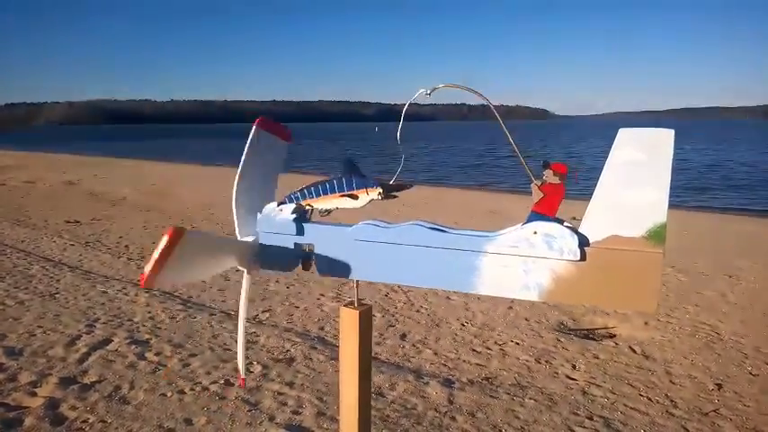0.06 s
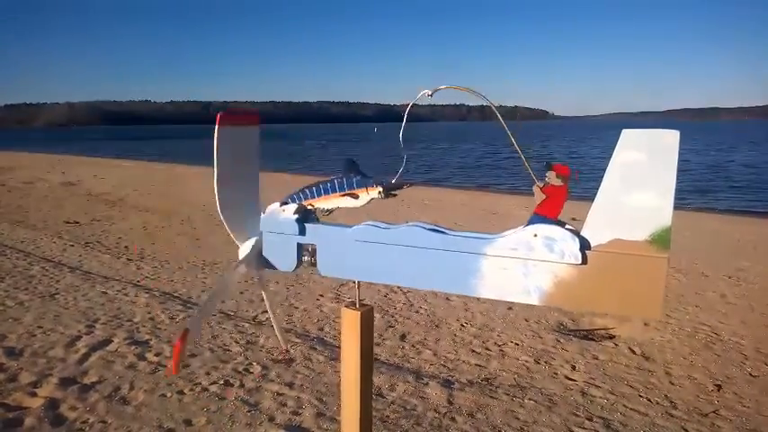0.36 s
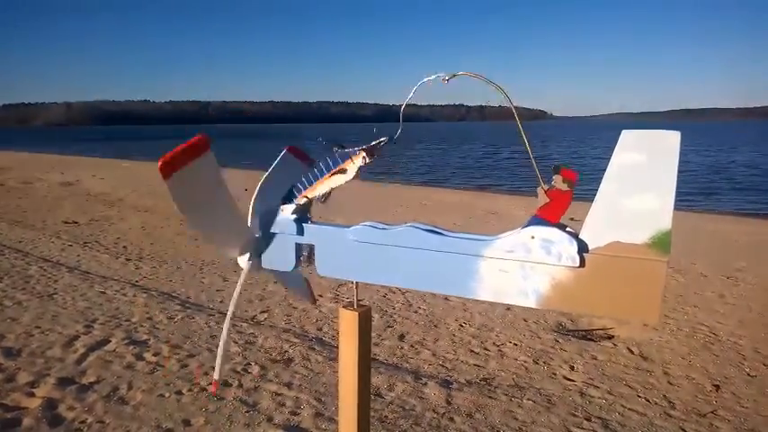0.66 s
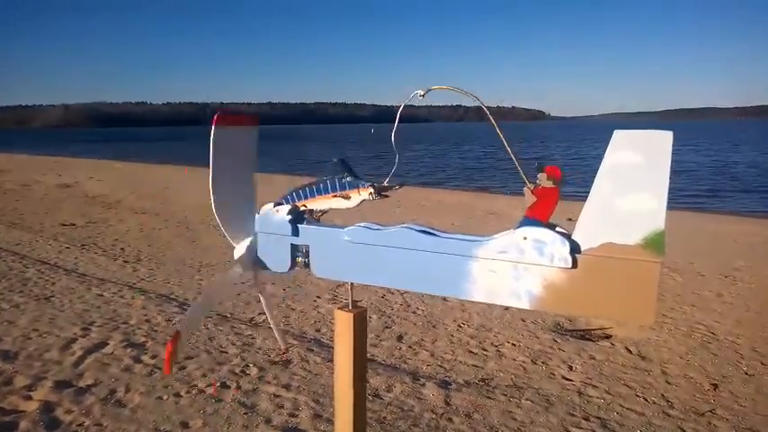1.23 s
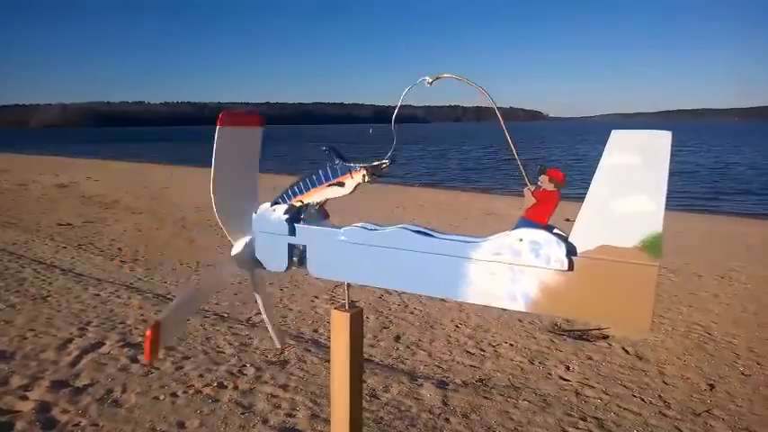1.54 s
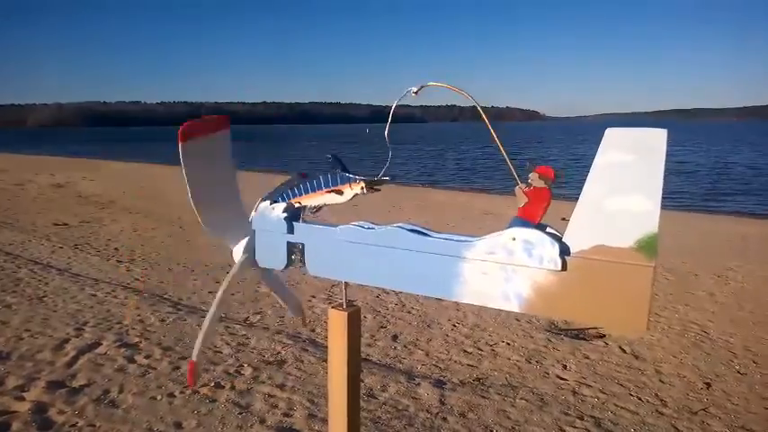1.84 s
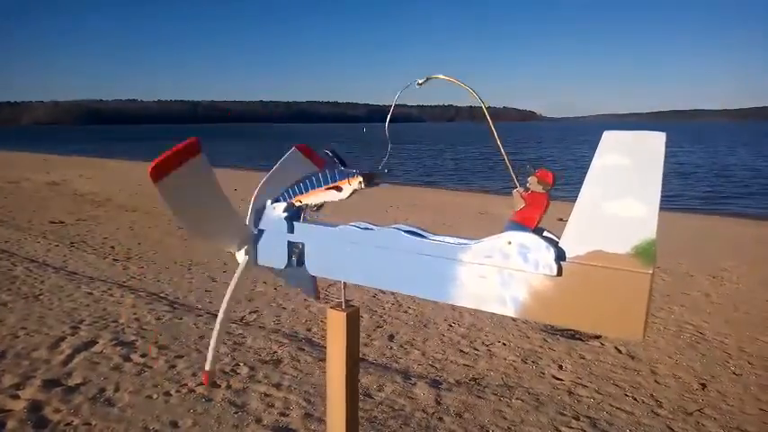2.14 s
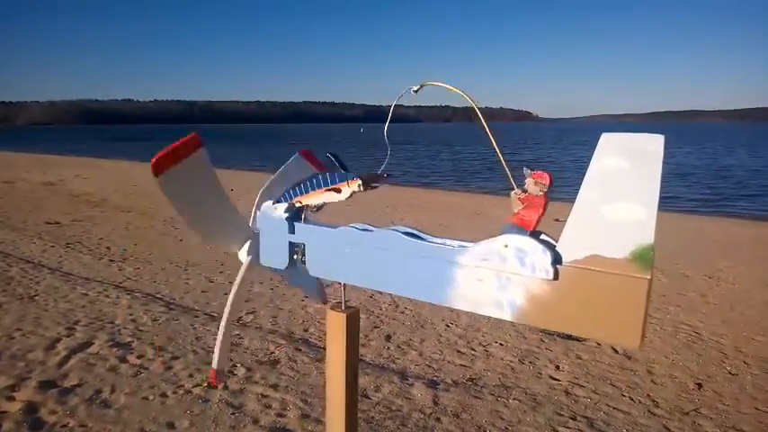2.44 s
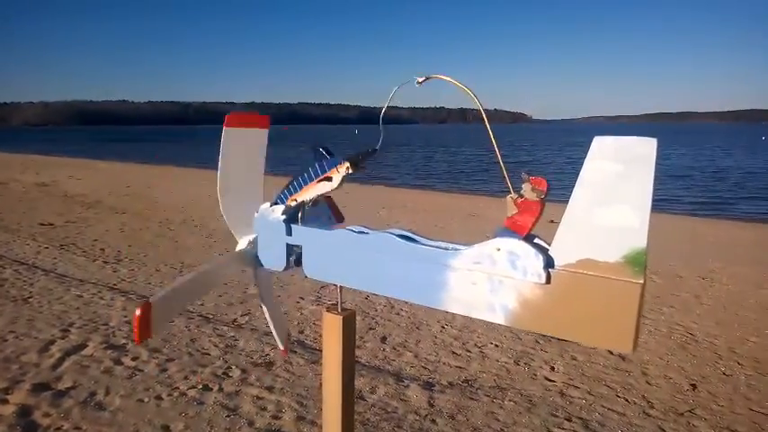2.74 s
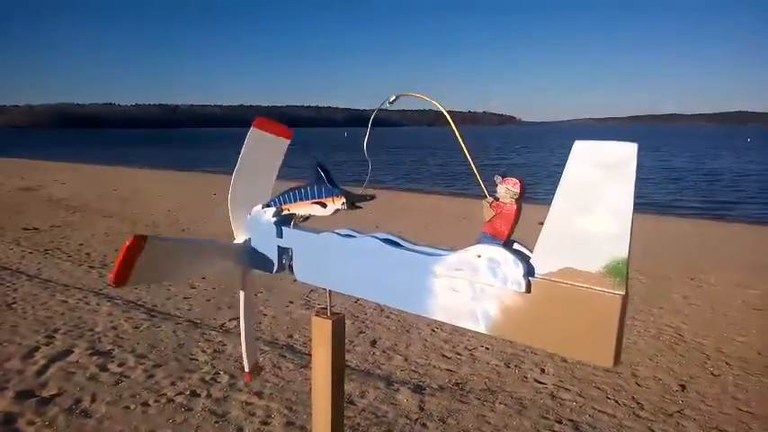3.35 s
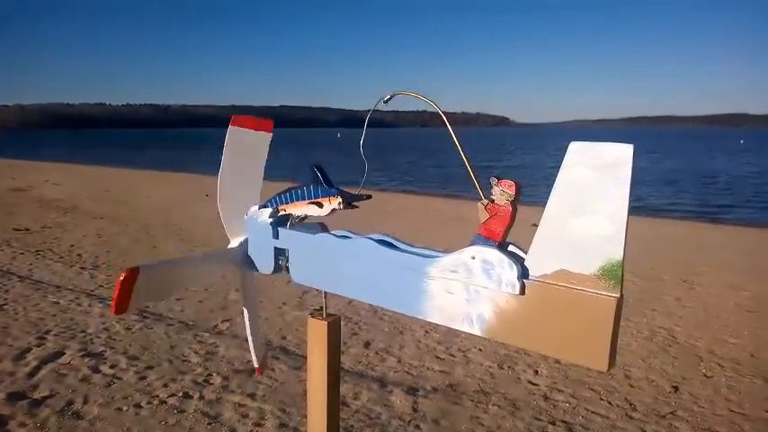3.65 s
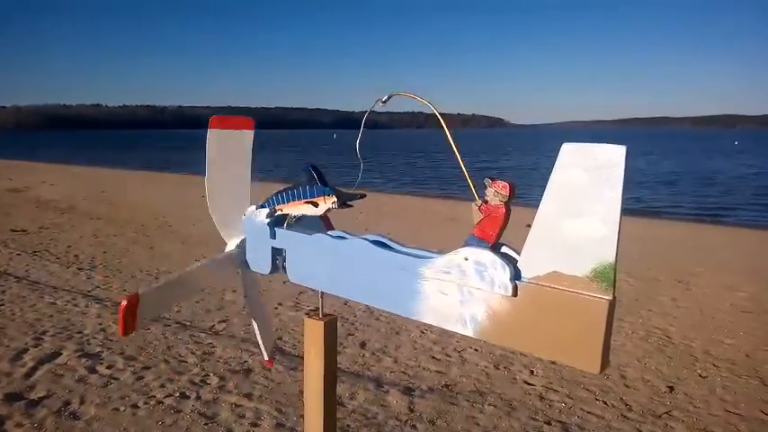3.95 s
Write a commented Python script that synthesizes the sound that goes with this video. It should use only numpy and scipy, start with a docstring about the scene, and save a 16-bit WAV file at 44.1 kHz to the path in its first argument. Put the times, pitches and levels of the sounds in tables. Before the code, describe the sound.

Irregular scraping, clacking and wire chatter from a wooden whirligig spinning in gusty wind.

```python
"""A wooden whirligig spins in a gusty breeze on a beach. From the start its loose shaft scrapes in
uneven strokes, the slack crank clacks and the wire linkage chatters with a bright ring, while wind
buffets the microphone over a faint shore hiss. Around the first second the dry bearing squeaks and
the wooden body starts to knock. The biggest gust lands near 1.7 s; then the wind eases while the
clacks and wire strikes grow harder, softening again just before the end."""
import sys
import numpy as np
from scipy.fft import rfft, irfft, next_fast_len
from scipy.io import wavfile
from scipy.ndimage import map_coordinates

SR = 44100
rng = np.random.default_rng(int(sys.argv[2]) if len(sys.argv) > 2 else 0)


def file_out(sig):
    """Save sig as 16-bit WAV at sys.argv[1]."""
    # one column per channel
    cols = np.atleast_2d(sig).T
    # limit, then scale
    lim = np.clip(cols, -1, 1)
    pcm = np.round(lim * 32767).astype(np.int16)
    wavfile.write(sys.argv[1], SR, pcm)


N = 176400

# Strokes of the shaft in its bearing: start t/s, end t/s, scrape level/dB, chatter level/dB.
# Levels in all tables are relative; each layer sets its own gain.
SHAFT_STROKES = [(.01, 0.094, -60.5, -58), (0.15, 0.198, -51.5, -57), (0.258, 0.33, -56, -59),
                 (0.371, 0.408, -54.5, -50), (0.432, 0.447, -87, -59), (0.477, 0.626, -55, -49.5),
                 (0.732, 0.762, -54, -50.5), (0.806, 0.845, -56, -67), (0.941, 1.106, -52.5, -56.5),
                 (1.167, 1.263, -50.5, -46), (1.319, 1.447, -49.5, -52), (1.484, 1.549, -54.5, -50.5),
                 (1.558, 1.677, -49, -48.5), (1.693, 1.787, -55, -58), (1.805, 1.849, -52, -54),
                 (1.936, 1.991, -46.5, -52), (2.011, 2.079, -46.5, -46.5), (2.097, 2.188, -53, -48.5),
                 (2.205, 2.291, -52.5, -43.5), (2.314, 2.447, -51, -49), (2.461, 2.529, -52.5, -45.5),
                 (2.531, 2.609, -45.5, -43.5), (2.621, 2.741, -50.5, -42), (2.851, 2.899, -47, -37),
                 (2.926, 3.072, -53, -50), (3.098, 3.227, -54.5, -48), (3.25, 3.335, -53.5, -56.5),
                 (3.316, 3.439, -50.5, -47), (3.457, 3.488, -61, -54), (3.492, 3.611, -57.5, -74),
                 (3.718, 3.788, -64.5, -59.5), (3.871, 3.921, -62, -84), (3.912, 3.952, -52, -51.5),
                 (3.965, 3.998, -65, -60.5)]


def shaft_scrape():
    """The shaft rubs in gritty strokes: a dry hiss, and small taps that set the wooden frame whirring."""
    hiss_colour = [(200, -40.5), (500, 10.5), (1000, 6), (2000, 9), (3500, 7), (5500, -13), (7000, 5),
                   (9800, 4.5), (12500, -8.5), (14000, -10), (16000, -17)]  # friction spectrum: f/Hz, level/dB
    frame_modes = [(599, 47, 1.5), (915, 51, 7.5), (1184, 62, 0), (1452, 18.3, 2.5), (1705, 133, 0),
                   (1826, 20, 0.5), (2358, 140, -4), (2700, 270, -5.5), (3085, 450, -5), (3510, 36, -31.5),
                   (4180, 130, -7), (4950, 93, -10), (5210, 37, -15.5), (5520, 200, -2.5)]  # frame resonances: f/Hz, width/Hz, level/dB
    strokes = [(start, end, db) for start, end, db, _ in SHAFT_STROKES]
    t = np.arange(N) / SR
    rise_s, release_s = .005, .0055
    pressure = np.full(N, amp(-79))
    for start, end, db in strokes:
        rise = np.clip((t - start) / rise_s + .5, 0, 1)
        pressure += amp(db) * rise * np.exp(-np.maximum(t - end, 0) / release_s)
    slips = unit(amp(5.3 * wobble(150) + 1.15 * wobble(28.23)))
    hiss = unit(filtered(slips * rng.standard_normal(N), lambda hz: amp(along(hiss_colour, hz))))
    force = amp(-11.5) * pressure
    tap = np.exp(-np.arange(1024) / (.0014 * SR))
    for s, db in rattle(strokes, per_s=85, scatter_db=6.5):
        add(force, s, amp(db + 2) * tap)

    def frame(hz):
        return sum((-1) ** k * amp(db) * 1j * hz * width / (centre ** 2 - hz ** 2 + 1j * hz * width)
                   for k, (centre, width, db) in enumerate(frame_modes))

    whir = filtered(rng.standard_normal(N) * force, frame)
    return amp(-5.5) * pressure * hiss + amp(12.5) * whir


def crank_and_body():
    """The slack crank clacks on its stop and shakes the wooden body; the shaft adds duller knocks."""
    clacks = [(.14, -58.5), (.52, -44.5), (.56, -50), (.583, -52), (.727, -55.5), (.804, -64), (.964, -48),
              (1.011, -49), (1.175, -51), (1.216, -41.5), (1.223, -43.5), (1.229, -49), (1.323, -55),
              (1.367, -45), (1.428, -72), (1.4416, -39.5), (1.5577, -44.5), (1.617, -41.5), (1.754, -44.5),
              (1.81, -46.5), (1.957, -37.5), (1.963, -42), (2.217, -39.5), (2.224, -42), (2.3375, -42),
              (2.409, -29.5), (2.4653, -47.5), (2.565, -38), (2.572, -39.5), (2.631, -42), (2.676, -44),
              (2.815, -51), (2.906, -32), (3.004, -46), (3.0193, -30), (3.085, -47.5), (3.24, -34),
              (3.246, -37), (3.327, -46), (3.355, -38), (3.414, -38), (3.525, -38.5), (3.5295, -32),
              (3.5365, -34.5), (3.544, -44), (3.6096, -43.5), (3.6436, -49.5), (3.6803, -51), (3.72, -56.5),
              (3.743, -62), (3.79, -55.5), (3.868, -48.5), (3.891, -56), (3.97, -58.5)]  # crank hitting its stop: t/s, level/dB
    knocks = [(0.4884, -69), (0.5226, -61), (0.6934, -49.5), (0.8063, -52), (0.9301, -46), (1.1751, -47),
              (1.2726, -42.5), (1.5941, -38.5), (1.7149, -41.5), (1.7338, -41), (2.027, -42), (2.0632, -48),
              (2.3162, -42.5), (2.3821, -40), (2.4168, -57), (2.6359, -40), (2.6604, -44), (2.6833, -46.5),
              (3.0518, -45), (3.3473, -41), (3.6435, -42.5), (3.9309, -61)]  # shaft bumping the body: t/s, level/dB
    crank_modes = [(926, -15, .05), (1440, -13, .035), (2170, 0, .028), (2290, -2, .024), (2690, -9, .022),
                   (3230, -1, .024), (3595, 0, .026), (4080, -6, .02), (4400, -13, .018), (4870, -11, .018),
                   (5240, -10, .018), (6300, -17, .013), (7490, -17, .02)]  # ring of the crank: f/Hz, level/dB, t60/s
    body_modes = [(572, -7, 0.062), (904, 2, 0.15), (958, 3, 0.088), (1181, 0, 0.084), (1333, -11.5, 0.013),
                  (1714, -9.5, 0.12), (1717, -28, 0.11), (2060, -41, 0.09)]  # ring of the body: f/Hz, level/dB, t60/s (capped in strikes)
    crack = [(300, -31), (900, 7), (2000, 7), (3500, 4.5), (5300, -11.5), (7000, -11.5), (10000, -7),
             (16000, -36)]  # spectrum of a dry clack: f/Hz, level/dB
    thud = [(200, -21), (600, -5.5), (1000, -9.5), (2000, -9), (4000, -21), (16000, -37)]  # spectrum of a dull bump: f/Hz, level/dB
    clack = strikes(clacks, crank_modes, crack, burst_db=-9.5, burst_t60=.0057,
                    attack_s=.00014, hold_s=.0046, scatter_db=2.5, detune=.0096)
    shake = strikes(clacks, body_modes, thud, burst_db=2.5, burst_t60=.093,
                    attack_s=.006, hold_s=.0028, scatter_db=1, detune=.0076)
    knock = strikes(knocks, body_modes, thud, burst_db=-6, burst_t60=.022,
                    attack_s=.002, hold_s=.0014, scatter_db=4, detune=.015)
    return amp(-1) * clack + amp(-22) * shake + amp(-4) * knock


def wire_linkage():
    """The wire chatters through each stroke and now and then strikes its eyelet with a bright snap."""
    ticks = [(0.1559, -41.5, -3), (0.1691, -41, -2), (0.1884, -41.5, -5), (0.2832, -51, -18),
             (0.3101, -46.9, -12), (0.3322, -50.6, -17), (0.3823, -50.5, 9), (0.4006, -52, 1),
             (0.5059, -48, -7), (0.5281, -38, -8), (0.5605, -56, -3), (0.5785, -46, 0), (0.6086, -41.5, -2),
             (0.7493, -44, -11), (0.8239, -43.5, -1), (0.971, -45, -6), (0.9964, -69, -15),
             (1.0103, -50.5, -14), (1.1823, -44, -3), (1.2213, -53, 0), (1.237, -46, -3), (1.2573, -45, -6),
             (1.3482, -40, -18), (1.3611, -39.5, -9), (1.5597, -43.0, -11), (1.604, -42, 0),
             (1.6467, -33, -3), (1.7293, -43.5, -14), (1.8204, -45.5, -19), (2.0229, -42.5, 10),
             (2.0392, -34, -1), (2.1236, -43.5, -17), (2.1453, -39.5, -6), (2.2354, -38, 2),
             (2.2524, -39, -7), (2.2691, -40, -7), (2.4335, -42.5, -13), (2.4913, -37, -2),
             (2.5209, -56, -11), (2.5405, -39, -23), (2.5966, -43.5, -2), (2.6404, -36, 4),
             (2.6572, -30, 2), (2.6759, -39, 3), (2.7183, -36, -11), (2.7333, -42.0, -11),
             (2.8566, -36.5, 8), (2.8706, -30.5, -5.5), (2.9374, -40.5, -10), (2.9781, -37, -3),
             (3.1068, -32.5, -8), (3.1228, -38.5, -9), (3.1719, -40.5, -11), (3.3362, -34, -4),
             (3.3479, -39, 10), (3.3657, -36.5, -3), (3.3971, -31.5, 2), (3.4237, -39, -4),
             (3.472, -45, -14), (3.5132, -48.7, -11), (3.5716, -48.5, -1), (3.7009, -43, -12),
             (3.9111, -38, -9), (3.9294, -37.5, 2)]  # wire striking the eyelet: t/s, level/dB, hardness/dB (extra snap)
    wire_modes = [(5100, -33.5, 0.057), (5290, -18.5, 0.061), (7590, -9, 0.045), (7920, -0.5, 0.024),
                  (7990, 1.5, .03), (8100, -1.5, 0.026), (9360, -17, 0.033), (9730, -14.5, 0.04),
                  (11050, -14, .015), (12250, -15, 0.013), (15600, -48, 0.015)]  # ring of the wire: f/Hz, level/dB, t60/s (capped in strikes)
    snap = [(500, -11), (2000, -6), (4200, -0.5), (5400, 2.5), (6900, -1.5), (8000, -21), (8800, -13),
            (9600, 9.5), (10600, -4.5), (12000, 3.5), (14000, -8), (16000, 3.5)]  # spectrum of a hard strike: f/Hz, level/dB
    zing = [(500, -15.5), (2000, -1.5), (4200, 16), (5400, 31.5), (6900, 3.5), (8000, -11), (8800, 4),
            (9600, 1.5), (10600, -36), (12000, 3), (14000, -10), (16000, 5)]  # spectrum of a light touch: f/Hz, level/dB
    strokes = [(start, end, db) for start, end, _, db in SHAFT_STROKES]
    touches = rattle(strokes, per_s=90, scatter_db=4)
    hard = strikes(ticks, wire_modes, snap, burst_db=3, burst_t60=.031,
                   attack_s=.0014, hold_s=.00067, scatter_db=3, detune=.0014)
    chatter = strikes(touches, wire_modes, zing, burst_db=-3, burst_t60=.02,
                      attack_s=.00048, hold_s=.0005, scatter_db=4, detune=.0013)
    return amp(-4) * (hard + chatter)


def bearing_squeaks():
    """The dry bearing briefly sticks and sings a wavering tone with its octave."""
    squeaks = [(1.009, .034, 1645, -51.5), (.53, .02, 1780, -60), (1.062, .025, 1790, -59)]  # moments of sticking: t/s, length/s, f/Hz, level/dB
    track = np.zeros(N)
    for s, length, hz, db in squeaks:
        progress = np.linspace(0, 1, int(length * SR))
        pitch = hz * (1 + .006 * wobble(288)[:len(progress)])
        phase = 2 * np.pi * np.cumsum(pitch) / SR
        swell = np.abs(np.sin(np.pi * np.sqrt(progress)))
        add(track, s, amp(db) * swell * (np.sin(phase) + amp(-2) * np.sin(2 * phase)))
    return track


def wind():
    """Wind buffets the microphone in lumps; gusts add smaller, faster eddies and two sharp puffs."""
    rumble_curve = [(0, -37), (.13, -39), (.165, -47), (.27, -50.5), (.31, -39), (.9, -36), (1.4, -32.5),
                    (1.6, -34.5), (1.74, -27), (1.84, -36), (1.97, -45), (2.12, -34.5), (2.24, -50),
                    (2.34, -34), (2.52, -46.5), (2.66, -43), (2.73, -59), (2.78, -39), (2.83, -51.5),
                    (2.97, -47), (3.1, -65), (3.18, -48.5), (3.44, -53.5), (3.57, -41), (3.82, -58),
                    (3.93, -47.5)]  # strength of the buffeting: t/s, level/dB
    eddy_curve = [(0, -73), (.25, -61), (.4, -43.5), (.72, -38.5), (.9, -44), (1.4, -38.5), (1.6, -37),
                  (1.74, -31), (1.95, -67), (2.14, -41), (2.24, -66), (2.34, -36.5), (2.46, -76),
                  (3.2, -73), (4, -78)]  # strength of the small eddies: t/s, level/dB
    rumble_colour = [(15, -5.5), (30, -4), (48, -0.5), (80, -2), (120, -13.5), (170, -23), (260, -33.5),
                     (500, -47.5), (1500, -81)]  # buffeting spectrum: f/Hz, level/dB
    eddy_colour = [(30, 0.5), (80, -15.5), (120, 14.5), (170, 3), (250, -5.5), (400, -25), (800, -22),
                   (2000, -49)]  # eddy spectrum: f/Hz, level/dB
    puffs = [(0.4908, -19, .0011), (0.7891, -28.5, .0016)]  # sharp eddies on the microphone: t/s, level/dB, width/s
    t = np.arange(N) / SR
    lumps_db = 2.4 * wobble(18)
    rumble = unit(noise(rumble_colour) * amp(lumps_db))
    eddies = unit(noise(eddy_colour) * amp(lumps_db + 3.8 * wobble(55)))
    track = amp(np.interp(t, *np.transpose(rumble_curve)) + 1) * rumble
    track += amp(np.interp(t, *np.transpose(eddy_curve)) - 2) * eddies
    for s, db, width in puffs:
        offset = (t - s) / width
        push_pull = -2 * offset / (1 + offset ** 2)
        track += amp(db) * push_pull * np.exp(-(offset / 5) ** 2)
    return track


def shore():
    """Small waves and breeze make a faint, swaying wash."""
    wash_colour = [(30, -12), (200, -17), (400, -6), (650, -3.5), (950, -3.5), (1300, -4), (1800, -12),
                   (2600, -16), (5000, -18.5), (10000, -45), (16000, -63)]  # spectrum of the wash: f/Hz, level/dB
    return amp(-71) * noise(wash_colour) * amp(3.6 * wobble(4.14) + .68 * wobble(40))


def strikes(contacts, modes, colour, burst_db, burst_t60, attack_s, hold_s, scatter_db, detune):
    """Each contact is a noise burst plus a ring that varies from hit to hit; both hold, then die away."""
    size, longest_t60 = 4096, .05
    track, t = np.zeros(N), np.arange(size) / SR
    hz, level, t60 = np.transpose(modes)
    free_s = np.maximum(t - hold_s, 0)
    decay = amp(level[:, None] - 60 * free_s / np.minimum(t60, longest_t60)[:, None])
    for s, db, *hardness in contacts:
        gain, shift, phase = rng.standard_normal((3, len(hz), 1))
        pitch = hz[:, None] * (1 + detune * shift)
        ring = (amp(scatter_db * gain) * decay * np.sin(2 * np.pi * (pitch * t + phase))).sum(0)
        burst = noise(colour, size) * amp(-60 * free_s / burst_t60)
        hit = unit(ring) + amp(burst_db + sum(hardness)) * unit(burst)
        hit *= 1 - np.exp(-t / attack_s)
        add(track, s, amp(db) * hit / hit[:SR // 200].std())  # the first 5 ms set the level
    return track


def rattle(strokes, per_s, scatter_db):
    """Uneven small contacts (t/s, level/dB) scattered through each stroke."""
    contacts = []
    for start, end, db in strokes:
        jitter, accents = rng.standard_normal((32, 2)).T
        times = start + (np.arange(len(jitter)) + .4 + .39 * jitter) / per_s
        contacts += [(s, db + scatter_db * min(accent, 1)) for s, accent in zip(times, accents) if s < end]
    return contacts


def amp(db):
    """Decibels to gain."""
    return 10 ** (np.asarray(db) / 20)


def unit(x):
    """Scale to rms 1."""
    return x / np.sqrt(np.mean(x ** 2) + 1e-20)


def along(spectrum, hz):
    """Read a spectrum's level at hz, on a log frequency axis."""
    knots_hz, db = np.transpose(spectrum)
    return np.interp(np.log(hz + 1), np.log(knots_hz + 1), db)


def wobble(rate):
    """A smooth random curve with rate knots a second."""
    return map_coordinates(rng.standard_normal(2048), [np.arange(N) * rate / SR], mode="mirror")


def filtered(x, response):
    """Shape x with a frequency response."""
    size = next_fast_len(len(x) + 4096)
    return irfft(rfft(x, size) * response(np.fft.rfftfreq(size, 1 / SR)), size)[:len(x)]


def noise(spectrum, size=N):
    """Coloured noise of rms 1."""
    return unit(filtered(rng.standard_normal(size), lambda hz: amp(along(spectrum, hz))))


def add(track, s, sound):
    """Mix a sound into the track at time s."""
    i = int(np.clip(round(s * SR), 0, N))
    track[i:i + len(sound)] += sound[:N - i]


def scene():
    """Wind and shore lie under the whirligig, close and dry in the open air, in mono."""
    return (wind() + shore() + shaft_scrape() + bearing_squeaks() + crank_and_body() + wire_linkage())[None]


def record(dry):
    """A steep high cut removes everything above 16.1 kHz."""
    return filtered(dry[0], lambda hz: hz < 16100)[None]


dry = scene()
out = record(dry)
file_out(out)
```